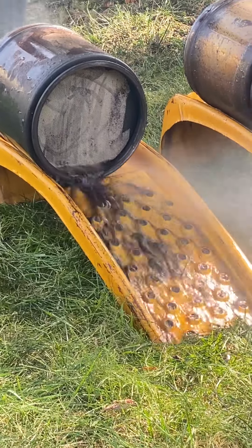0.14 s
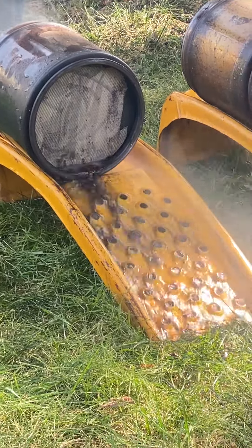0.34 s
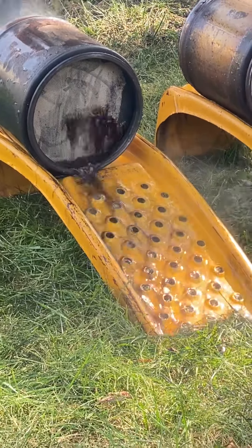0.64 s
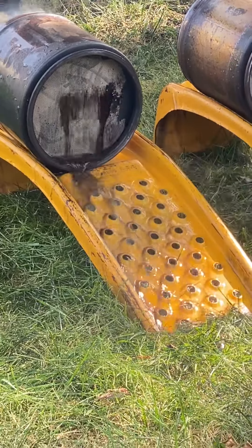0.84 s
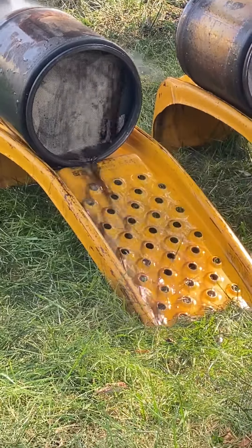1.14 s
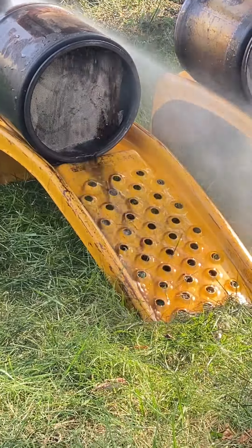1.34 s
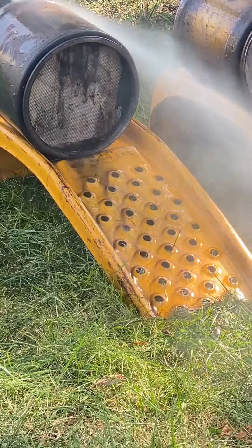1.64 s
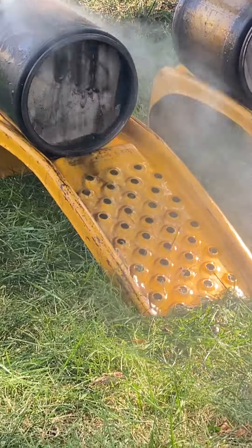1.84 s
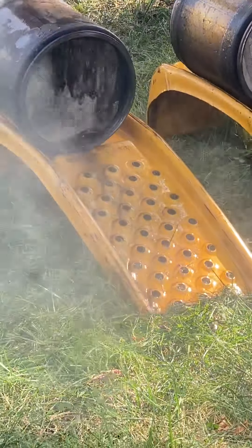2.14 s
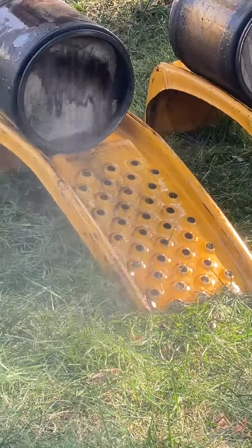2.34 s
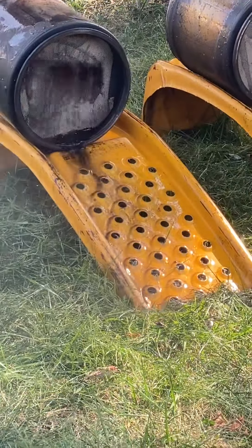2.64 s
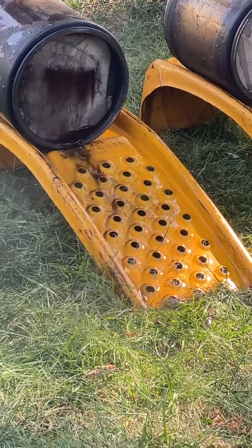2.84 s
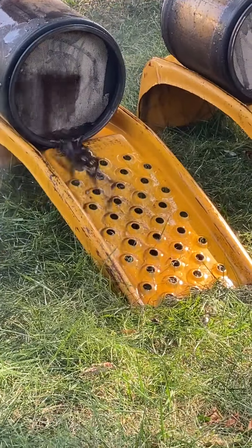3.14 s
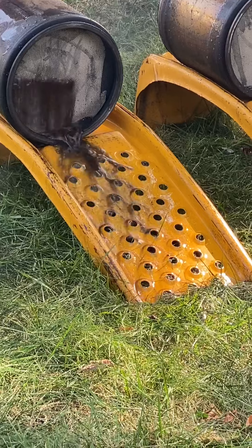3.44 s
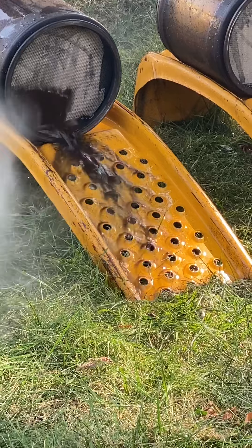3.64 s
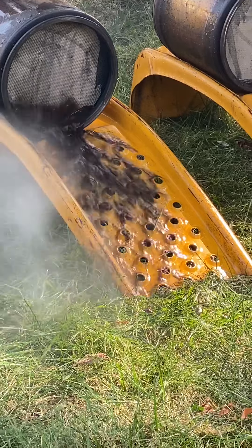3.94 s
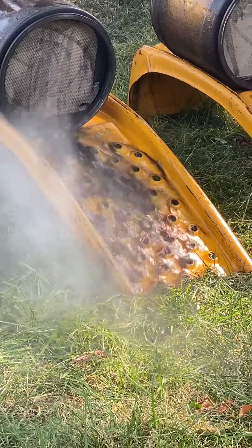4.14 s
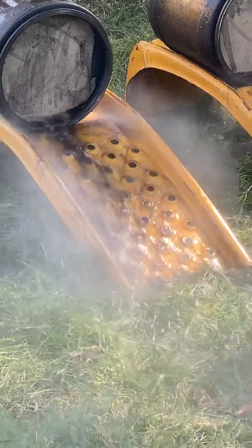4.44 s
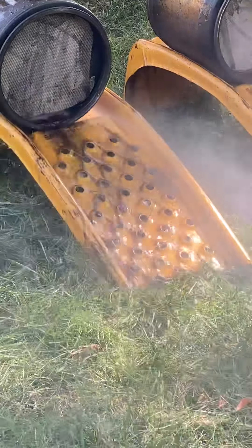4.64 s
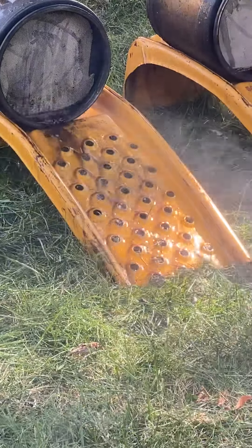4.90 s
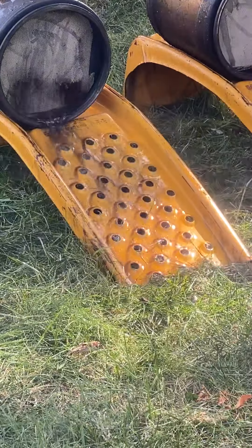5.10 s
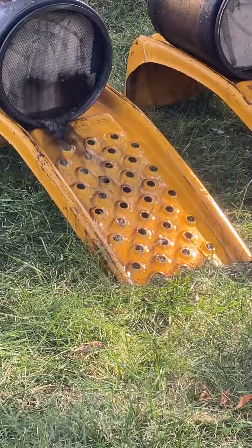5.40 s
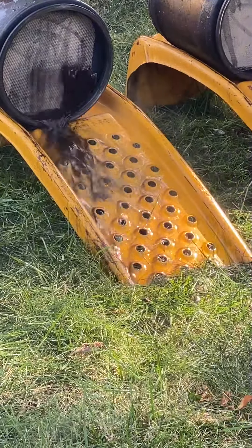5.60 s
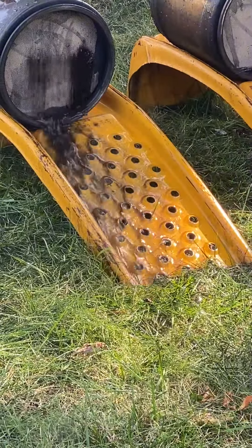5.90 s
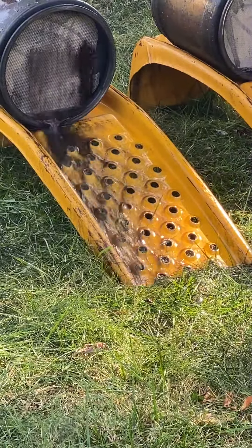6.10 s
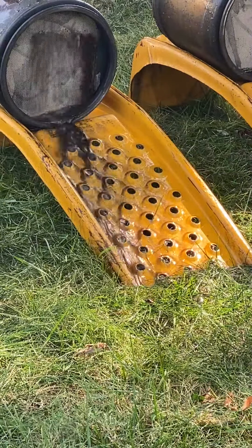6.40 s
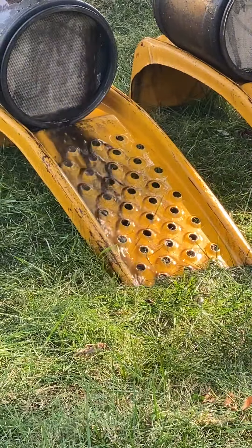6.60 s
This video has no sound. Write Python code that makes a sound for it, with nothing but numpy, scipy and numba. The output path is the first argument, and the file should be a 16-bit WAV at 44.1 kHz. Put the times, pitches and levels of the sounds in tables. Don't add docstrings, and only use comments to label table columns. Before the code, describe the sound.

A pressure washer runs throughout on an open lawn: a low, fast buzz near thirty turns a second, with ticking valves and rattling casing, under a bright, slightly pulsing water hiss. The jet sweeps a hollow metal filter drum, raising wet, turbulent roars with a deep boom and a nasal middle. The opening roar is already dying at 0; another swells around 0.2-0.5, then it eases. Roars return from 1.3, the strongest at about 1.5-1.9, after which the recorder abruptly lowers its level around 1.7. Weaker surges follow from 2.1 to 3.5, a longer one at 3.75-4.1, then fuller roars near 4.3, 4.7 and 5.4. The level lifts slightly at 5.7. Dull, soft footfalls fall at about 5.85 and, fainter, 6.4, alongside a small last surge near 6.5. Motor and hiss continue to the end at about 6.8, close and dry.

```python
import sys
import numpy as np
from scipy import signal
from scipy.fft import rfft, irfft
from scipy.io import wavfile
from scipy.ndimage import uniform_filter1d
from numba import njit

SR = 44100
rng = np.random.default_rng(int(sys.argv[2]) if len(sys.argv) > 2 else 0)


def field_ratio(decibels):
    return 10 ** (np.asarray(decibels, dtype=float) / 20)


def file_out(sig):
    cols = np.atleast_2d(sig).T
    lim = np.clip(cols, -1, 1)
    pcm = np.round(lim * 32767).astype(np.int16)
    wavfile.write(sys.argv[1], SR, pcm)


N = 298116
MOUTH_REST_HZ = 1313


def rms_one(x):
    return x / np.sqrt(np.mean(x ** 2) + 1e-20)


def in_time(rows):
    s, *columns = np.transpose(rows)
    return [np.interp(np.arange(N) / SR, s, c) for c in columns]


def at_hz(points, hz):
    table_hz, value = np.array(points).T
    return np.interp(np.log(hz), np.log(table_hz), value)


def drift(rate):
    r = np.exp(-80 * np.pi * rate / SR)
    slow = signal.lfilter([1], [1, -2 * r, r * r], rng.standard_normal(N // 40 + 4002))[4000:]
    return np.interp(np.arange(N) / 40, np.arange(len(slow)), rms_one(slow))


def coloured_noise(spectrum, patchy_db):
    hz = np.maximum(np.fft.rfftfreq(N, 1 / SR), 1)
    lowest_hz = spectrum[0][0]
    white = rfft(rng.standard_normal(N)) * field_ratio(at_hz(spectrum, hz)) * (hz > lowest_hz)
    out, together = 0, drift(8.8)
    for octave in range(int(np.log2(lowest_hz)), 15):
        window = np.clip(1 - abs(np.log2(hz) - octave), 0, 1)
        flicker_db = patchy_db * (together + 0.38 * drift(15))
        out = out + irfft(white * window, N) * field_ratio(flicker_db)
    return rms_one(out)


@njit
def sliding_ring(x, w, r):
    out = np.zeros(len(x))
    for i in range(2, len(x)):
        push = (1 - r[i] * r[i]) * (x[i] - x[i - 2])
        out[i] = push + 2 * r[i] * np.cos(w[i]) * out[i - 1] - r[i] * r[i] * out[i - 2]
    return out


def hollow(hz, width_hz, lumpy_db):
    x = rng.standard_normal(N) * field_ratio(lumpy_db * drift(67))
    w = 2 * np.pi * hz * np.ones(N) / SR
    r = np.exp(-np.pi * width_hz * np.ones(N) / SR)
    return rms_one(sliding_ring(sliding_ring(x, w, r), w, r) / np.sqrt(width_hz))


def throb(turns, place, depth_db, sharp):
    return field_ratio(depth_db * np.exp(-sharp * ((turns - place) % 1)))


def pump(turns):
    # (place in the turn [0-1], ring offset [rad], [(multiple of shaft speed, level/dB)])
    piston_thump = (-0.14, -1.8, [(1, -28), (2, 0), (3, -3)])
    casing_boom = (0.444, 1.6, [(4, -9.5), (5, -23), (6, -16.5)])
    crank_knock = (0.439, 2.46, [(7, -4.5), (8, -10), (9, -7.5), (10, -13.5)])
    buzz_db = [-23.5, -18.5, -20, -23.5, -19.5, -43, -26, -4.5, -16.5, -17.5, -17.5, -16, -20, -11, -17.5,
               -19.5, -15.5, -13, -17.5, -14, -11, -33, -23.5, -18, -31, -22, -17, -34, -15, -20, -22, -47,
               -15, -33, -23, -33, -26, -18, -45, -41, -49, -36, -26]
    tones = []
    for place, offset, part in (piston_thump, casing_boom, crank_knock):
        for k, level_db in part:
            tones.append((k, level_db, offset - 2 * np.pi * k * place))
    for k, level_db in enumerate(buzz_db, start=11):
        in_step = k % 6 == 0
        tones.append((k, level_db, 0 if in_step else rng.uniform(0, 2 * np.pi)))
    wavers, out = [drift(5.8) for _ in range(7)], 0
    for k, level_db, phase in tones:
        waver = 1 + 0.025 * np.sqrt(k) * wavers[k % 7]
        out = out + field_ratio(level_db) * waver * np.cos(2 * np.pi * k * turns + phase)
    return np.sqrt(2) * out


def rattle(turns):
    # (f/Hz, level/dB per Hz)
    rattle_spectrum = [(30, -24), (55, 0), (150, -3.5), (300, 2.5), (450, -9), (650, -13), (850, 1),
                       (1040, -7), (1300, 2), (1800, -8), (2400, -6.5), (2800, -21), (4300, -8.5),
                       (7000, -25.5)]
    beats = field_ratio(1.9 * np.cos(12 * np.pi * (turns - .03)))
    noise = coloured_noise(rattle_spectrum, patchy_db=1.1)
    return noise * beats * throb(turns, 0.13, depth_db=5.5, sharp=3.2)


def spray(turns, keen_db):
    # (f/Hz, level/dB per Hz)
    hiss_spectrum = [(1500, -5.5), (3000, -2), (4300, -1.5), (5200, -4.5), (6500, -1), (8000, 0),
                     (10000, -3), (11800, -6), (13300, -4), (14100, -5.5), (15700, -2)]
    hiss = coloured_noise(hiss_spectrum, patchy_db=0.42)
    keen_band = np.exp(-((np.fft.rfftfreq(N, 1 / SR) - 11500) / 1900) ** 2)
    keen = irfft(rfft(hiss) * keen_band, N)
    return (hiss + (field_ratio(keen_db) - 1) * keen) * throb(turns, 0.3, depth_db=3.5, sharp=3.9)


def strikes():
    # (start t/s, hold t/s, deep hollow rise level/dB, mouth rise level/dB, mouth f/Hz)
    hits = [(-.06, 0.064, 2.5, 10, 1340), (0.182, .27, 6, 10.5, 1310), (1.31, 0.043, 4.5, 4, 1450),
            (1.492, .21, 8, 9, 1510), (1.836, .12, 10, 9, 1210), (2.09, 0.069, 2, 1, 1270),
            (2.402, 0.1, 1.5, 3, 1190), (2.98, .04, 2, 4.5, 1230), (3.298, 0.15, 0, 3, 1230),
            (3.75, 0.37, -1, 3.5, 1310), (4.24, 0.22, 5, 11, 1350), (4.643, .21, 5, 8.5, 1310),
            (5.385, 0.093, 5, 8, 1350), (6.345, .03, -2.5, -1, 1300), (6.468, 0.035, 2.5, 0.5, 1350)]
    attack_s, release_s = .15, .13
    t, deep_db, mouth_db, mouth_hz = np.arange(N) / SR, 0, 0, MOUTH_REST_HZ
    for s, hold, deep, mouth, hz in hits:
        swell = 1 + (t - s) / attack_s
        let_go = 1 - (t - s - hold) / release_s
        ramp = np.sin(np.clip(np.minimum(swell, let_go), 0, 1) * np.pi / 2) ** 2
        deep_db = deep_db + deep * ramp
        mouth_db = mouth_db + mouth * ramp
        mouth_hz = mouth_hz + (hz - MOUTH_REST_HZ) * ramp
    return deep_db, mouth_db, mouth_hz


def jet(turns):
    # (t/s, spray towards the recorder level/dB, jet grazing the drum level/dB, deep hollow f/Hz)
    wand = [(0, -8.5, 1, 885), (.4, -10.5, -2.5, 940), (.65, -9.5, -6, 850), (1.15, -5, 0, 820),
            (1.5, -5.5, 0, 830), (1.95, -3, -0.5, 840), (2.12, -5, 1.5, 810), (2.45, -5, -1, 790),
            (3.0, -6, -3, 830), (3.65, -5.5, 0.5, 870), (4.0, -7, 0.5, 775), (4.3, -7.5, 1.5, 715),
            (4.55, -9, 0, 785), (4.75, -9, -0.5, 830), (5.1, -9.5, -5, 820), (5.75, -8.5, -4.5, 815),
            (6.3, -6, -3, 815), (6.76, -5.5, -1, 765)]
    spray_db, graze_db, deep_hz = in_time(wand)
    deep_rise_db, mouth_rise_db, mouth_hz = strikes()
    rim_hz = mouth_hz - MOUTH_REST_HZ
    deep_db = graze_db + deep_rise_db
    mouth_db = graze_db + mouth_rise_db
    shell_db = -3 + graze_db + 0.59 * mouth_rise_db + 0.37 * deep_rise_db - 0.62 * (spray_db + 7.5)
    shell_db = shell_db - 0.02 * rim_hz

    fill_s = 0.056
    lag = np.exp(-1 / (fill_s * SR))
    filled_db = signal.lfilter([1 - lag], [1, -lag], deep_rise_db)
    boom_hz = 386 + 18.5 * filled_db
    shell_hz = 2127 - 34 * deep_rise_db
    deep_width_hz = np.clip(296 + 37 * (spray_db + 9.5) + (deep_hz - 820), 150, 600)
    mouth_width_hz = np.maximum(470 - 0.41 * rim_hz, 200)

    boom = field_ratio(spray_db + 1.06 * deep_db - 3.5) * hollow(boom_hz, width_hz=306, lumpy_db=-1.0)
    deep = field_ratio(1.62 * deep_db - 3.0) * hollow(deep_hz, deep_width_hz, lumpy_db=1.14)
    mouth = field_ratio(0.98 * mouth_db - 4.0) * hollow(mouth_hz, mouth_width_hz, lumpy_db=1.7)
    shell = hollow(shell_hz, width_hz=1230, lumpy_db=1.5)
    soaked = signal.butter(6, 2550, fs=SR, output="sos")
    shell = field_ratio(1.07 * shell_db - 0.96) * signal.sosfilt(soaked, shell)
    echo_notch = signal.iirnotch(660, 8.5, SR)
    roar = signal.lfilter(*echo_notch, boom + deep + mouth + shell)
    splash = field_ratio(-6.5 + shell_db + 1.05 * spray_db) * hollow(3240, width_hz=1600, lumpy_db=2.5)
    hiss = field_ratio(spray_db + 6.5) * spray(turns, keen_db=-0.12 * mouth_rise_db)
    return roar + splash + hiss


def footfalls():
    # (t/s, peak level/dB)
    steps = [
        (5.835, -24),
        (6.381, -28),
    ]
    t, out = np.arange(N) / SR, 0
    for s, db in steps:
        since_peak = t - s - .02
        swell = np.exp(-(since_peak / .016) ** 2)
        out = out + field_ratio(db + 24) * swell * np.cos(2 * np.pi * 74 * since_peak)
    return out


def gain_db():
    snap_s, lift_s = 1.718, 5.74
    t = np.arange(N) / SR
    after = np.maximum(t - snap_s, 0)
    before = 1.2 * np.exp(np.minimum(t - snap_s, 0) / .015)
    sag = -1.16 * (1 - np.exp(-after / 0.33))
    held = -2.5 + sag - 1.5 * np.exp(-after / 0.047)
    stepped = np.where(t < snap_s, before, held) + 1.55 * (t > lift_s)
    return -27 + uniform_filter1d(stepped, size=300) + .15 * drift(2.4)


def scene():
    shaft_start, shaft_hz = .094, 29.348
    turns = shaft_start + shaft_hz * np.arange(N) / SR + 0.019 * drift(0.65)
    mono = pump(turns) + field_ratio(-5) * rattle(turns) + jet(turns) + footfalls()
    return np.array([mono, mono])


def band_limit(x):
    return signal.sosfilt(signal.butter(12, 15750, fs=SR, output="sos"), x)


def record(dry):
    # (f/Hz, lead of the left [rad])
    port_lead = [(300, 0), (900, .65), (1450, .16), (1900, -.03), (2650, 1.15), (3600, .1), (4300, .6),
                 (4700, 1.9), (4900, np.pi), (5250, 6.15), (5800, 6.85), (8000, 7.9), (10500, 8.5),
                 (12200, 3 * np.pi)]
    # (f/Hz, left minus right level/dB)
    port_balance = [(60, 0.5), (110, -1.5), (200, -3), (370, -5.5), (670, -2.5), (1230, -0.5), (2250, 0.5),
                    (4120, 0.0), (7530, 0.0), (13800, 0.0)]
    # (f/Hz, level/dB)
    scatter = [(300, -57), (1000, -11.5), (1800, -30), (2800, -6.5), (3600, -15.5), (4500, -6), (4900, -13),
               (5050, -11), (5350, -28), (5900, -12), (11500, -10), (13000, -22)]
    hz = np.maximum(np.fft.rfftfreq(N, 1 / SR), 1)
    heard = rfft(dry * field_ratio(gain_db()))
    half = np.exp(.5j * at_hz(port_lead, hz)) * field_ratio(at_hz(port_balance, hz) / 2)
    late = field_ratio(at_hz(scatter, hz)) * np.exp(-2j * np.pi * hz * .071)
    ports = heard * np.array([half * (1 + late), (1 - late) / half])

    top = irfft(ports.mean(axis=0) * np.clip((hz - 9600) / 1500, 0, 1), N)
    t = np.arange(N) / SR
    weak = (t > 3.89) & (t < 6.5)
    top_db = np.where(weak, -5 + 1.6 * drift(0.85), 2.2)
    mix = irfft(ports, N) + (field_ratio(top_db + 2.3 * drift(19)) - 1) * top
    return band_limit(mix)


dry = scene()
out = record(dry)
file_out(out)
```